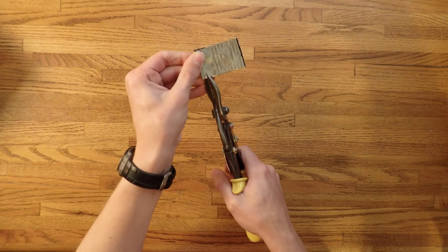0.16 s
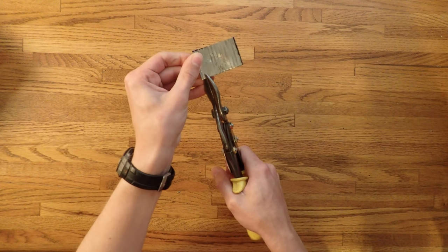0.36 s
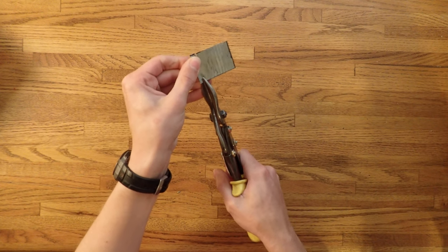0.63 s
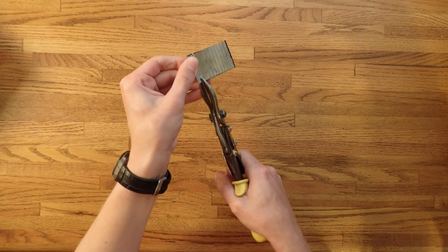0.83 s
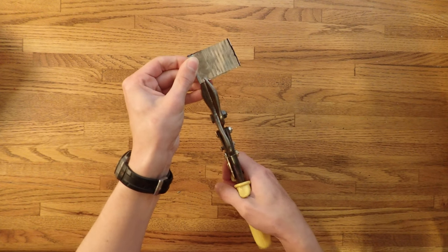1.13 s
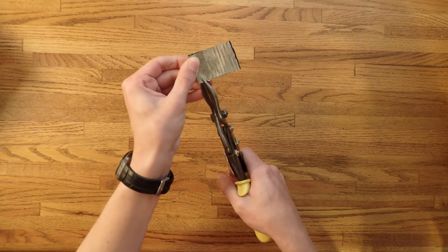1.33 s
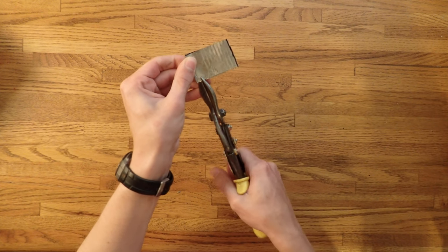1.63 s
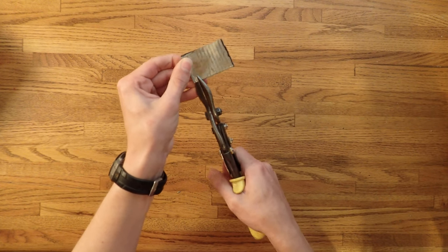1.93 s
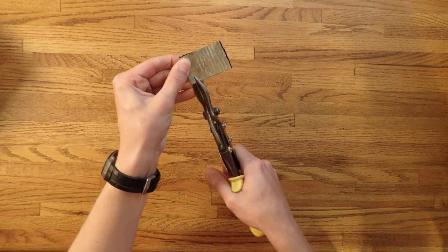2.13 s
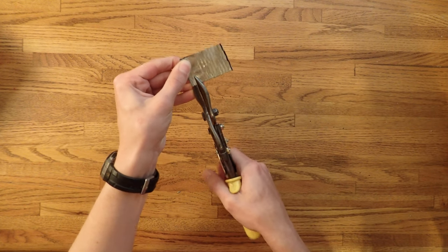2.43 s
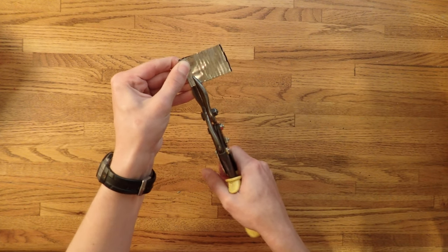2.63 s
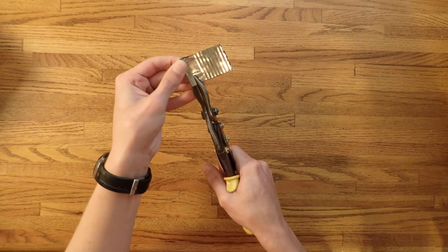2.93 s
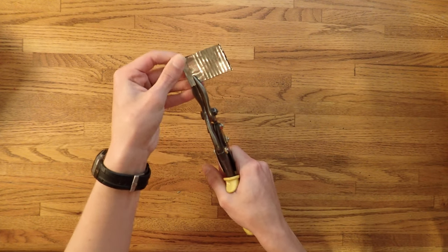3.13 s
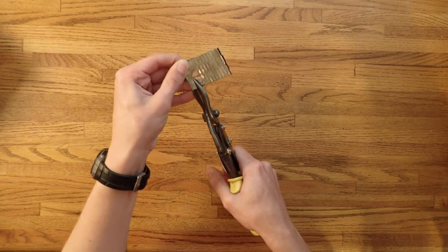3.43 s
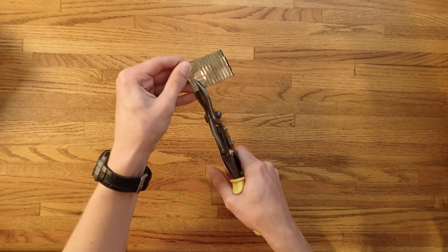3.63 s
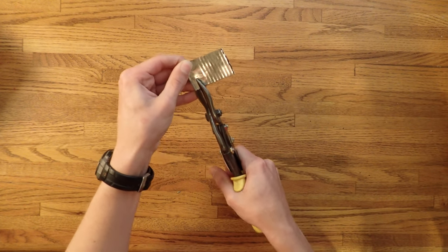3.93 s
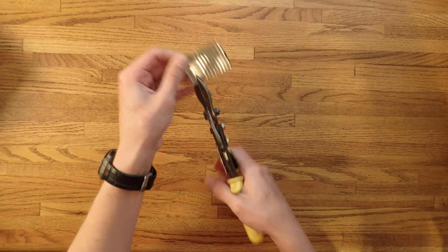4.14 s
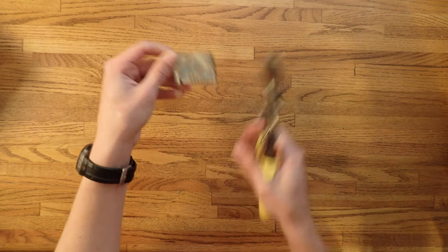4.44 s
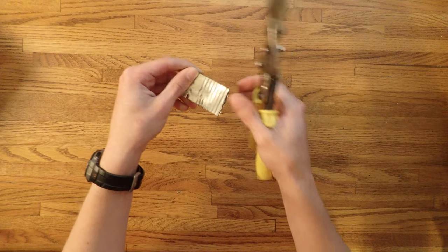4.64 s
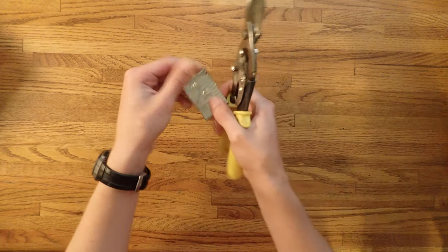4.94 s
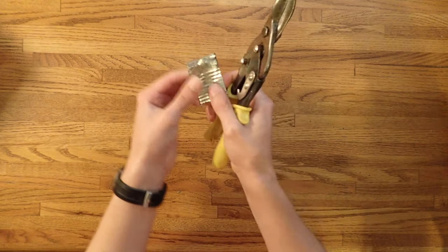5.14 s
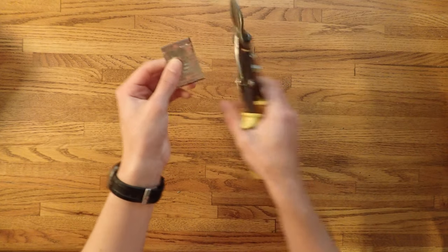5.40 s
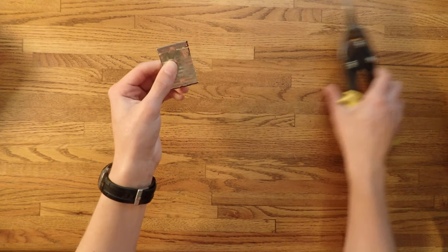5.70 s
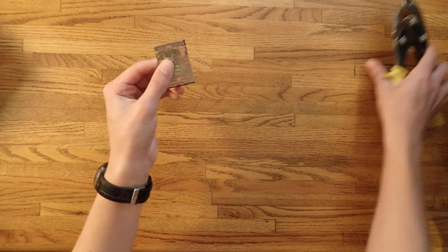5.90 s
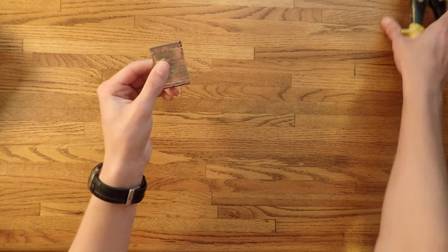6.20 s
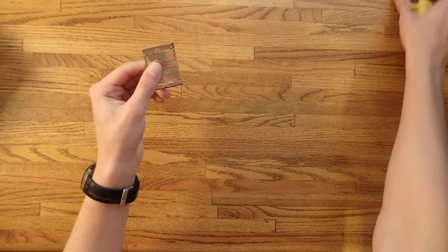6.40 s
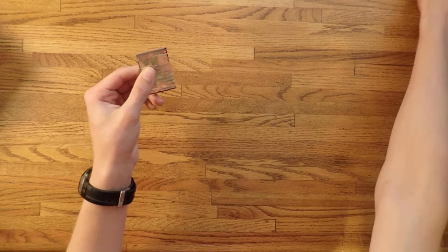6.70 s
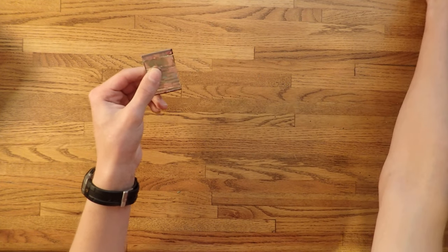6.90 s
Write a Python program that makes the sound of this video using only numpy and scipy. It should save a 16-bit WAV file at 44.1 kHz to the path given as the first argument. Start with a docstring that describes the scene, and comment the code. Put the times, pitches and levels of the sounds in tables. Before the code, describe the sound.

Hand snips work on a small piece of sheet steel, recorded near, with a short room reflection and faint hiss. Bright uneven ticks and stick-slip rasps lead to four hard metallic snaps over the first four seconds. Afterwards come lighter rattles of the loose jaws, a hard knock on wood, softer thuds and a brief judder with squeals.

```python
"""Tin snips on a metal sheet

Tin snips cut four short slits in a small metal sheet, indoors over a wooden table.
The blades rub in stick-slip strokes and ticks: shaped noise that rings the modes of the steel.
Each cut crunches in tiny fractures and ends in a sharp snap that sets the sheet shivering.
The snips are then set down with knocks, and scrape and squeak as they are pushed aside."""
import sys
import numpy as np
from scipy import signal
from scipy.fft import rfft, irfft, next_fast_len
from scipy.io import wavfile

SR = 44100
rng = np.random.default_rng(int(sys.argv[2]) if len(sys.argv) > 2 else 0)


def int16_out(signal):
    """Quantize to a 16-bit WAV file."""
    q = np.round(np.clip(np.atleast_2d(signal).T, -1, 1) * 32767)
    wavfile.write(sys.argv[1], SR, q.astype(np.int16))


N = 311331
TIME = np.arange(N) / SR
SIZE = next_fast_len(N + SR // 4, True)  # padded so that tails do not wrap around
FREQ = np.fft.rfftfreq(SIZE, 1 / SR)


def amp(db):
    """Amplitude factor of a level in dB."""
    return 10 ** (np.asarray(db) / 20)


def unit(x):
    """x scaled to rms 1."""
    return x / np.sqrt(np.mean(x ** 2) + 1e-20)


def along(points, hz=FREQ):
    """Curve through (frequency [Hz], value) points, straight on a log-frequency axis."""
    point_hz, values = np.transpose(points)
    return np.interp(np.log(hz + 1), np.log(point_hz + 1), values)


def filtered(x, response):
    """x through a frequency response."""
    return irfft(rfft(x, SIZE) * response, SIZE)[..., :N]


def causal(gain):
    """Minimum-phase response of unit power with the shape of the given gain."""
    cepstrum = irfft(np.log(np.maximum(gain, 1e-6)), SIZE)
    # folding the cepstrum forward in time makes the response start at once
    cepstrum[1:SIZE // 2] *= 2
    cepstrum[SIZE // 2 + 1:] = 0
    return np.exp(rfft(cepstrum)) / np.sqrt(np.mean(gain ** 2))


def ringing(modes):
    """Gain of a broad response with resonances standing on it."""
    response = 1
    for hz, width_hz, db in modes:
        damping = 1j * FREQ * width_hz
        response = response + amp(db) * damping / (hz * hz - FREQ ** 2 + damping)
    return np.abs(response)


def add(track, s, x):
    """Mix x into track at time s."""
    i = int(np.clip(round(s * SR), 0, N - 1))
    track[..., i:i + x.shape[-1]] += x[..., :N - i]


def grit(count):
    """White noise for one short contact."""
    return np.resize(rng.standard_normal(SR // 4), count)


def burst(length, fall_db):
    """A dying rattle of micro-contacts, rms about 1.7 (the square root of 3) over three times its length."""
    t = np.arange(int(3 * length * SR) + 2) / SR
    # past the nominal length the fall steepens
    shape = amp(-abs(fall_db) * t / length - 9.9 * np.maximum(t / length - 1, 0))
    return unit(grit(len(t)) * shape) * np.sqrt(3)


def tick(length, strike_share, rise_s):
    """A short rattle with one sharp strike as it builds up, rms about 1 over its length."""
    t = np.arange(int(3 * length * SR) + 2) / SR
    fall = amp(-8 * t / length - 11 * np.maximum(t / length - 1, 0))
    rattle = grit(len(t)) * fall * (1 - np.exp(-t / rise_s))
    share = np.clip(strike_share, 0, 1)  # of the energy
    force = np.sqrt(1 - share) * rattle / np.linalg.norm(rattle)
    force[min(int(rise_s * SR), len(t) - 1)] += np.sqrt(share)
    return force * np.sqrt(length * SR)


def stick_slip(length, rate, swell_db, jitter, slip_s, grit_db, rise_s):
    """Uneven slips that catch and let go over a thin, steady grit, rms 1."""
    t = np.arange(int(max(length, .002) * SR)) / SR
    gaps = np.exp(jitter * rng.standard_normal(256)) / rate
    starts = np.cumsum(gaps) - gaps[0]
    last = np.searchsorted(starts, t, "right") - 1
    sizes = amp(rng.normal(0, 0.95, len(starts)))
    shape = sizes[last] * np.exp(-(t - starts[last]) / slip_s) + amp(grit_db)
    pressure = amp(swell_db * t / length) * (1 - np.exp(-t / rise_s))
    return unit(grit(len(t)) * shape * pressure)


# tone of the quiet background: (frequency [Hz], relative level [dB])
HUSH_TONE = [(15, -41), (25, -11.5), (130, -3.5), (161, -5.5), (236, -7), (439, -10), (476, -11),
             (641, -14), (695, -14), (1740, -22), (2220, -27), (3080, -27.5), (4870, -28.5), (7710, -24.5),
             (16000, -28.5)]
# how alike the background is left and right: (frequency [Hz], correlation [-1 to 1])
HUSH_LIKENESS = [(60, 0.29), (180, 0.11), (550, 0.038), (1650, 0.12), (4970, 0.067), (15000, -0.2)]
HUSH_DB = -51.5  # rms of its mid signal


def hush():
    """Quiet room rumble and microphone hiss: coloured noise with a hiss peak near 8 kHz."""
    turn = np.arccos(np.clip(along(HUSH_LIKENESS), -1, 1)) / 2
    low_cut = 1 / np.sqrt(1 + (38 / (FREQ + 1)) ** 8)
    colour = amp(along(HUSH_TONE)) * ringing([(7630, 1200, 4.2)]) * low_cut
    balance = np.array([np.cos(turn), np.sin(turn)])
    mid, side = filtered(rng.standard_normal((2, N)), colour * balance)
    return amp(HUSH_DB) * np.array([mid + side, mid - side]) / np.std(mid)


# decay of the room: (frequency [Hz], t60 [s])
ROOM_DECAY = [(150, 0.42), (600, 0.3), (2000, 0.27), (5000, 0.29), (8000, 0.24), (15000, 0.19)]
# stereo width of the room's answer: (frequency [Hz], side against mid [dB])
ROOM_WIDTH = [(300, -25), (1500, -22), (4000, -7), (8000, -2.5), (14000, 3.5)]


def room(x, wet_db):
    """Near walls answer with a short, dying noise tail, drawn anew each quarter second."""
    out, step = np.zeros((2, N)), SR // 4
    for i in range(0, N, step):
        hz, t, spectrum = signal.stft(rng.standard_normal((2, SR // 3)), SR, nperseg=256)
        build = 1 - np.exp(-t / 0.0005)
        decay = amp(-60 * t / along(ROOM_DECAY, hz)[:, None])
        tail = signal.istft(spectrum * build * decay, SR, nperseg=256)[1]
        tail = tail / np.linalg.norm(tail[0])
        add(out, i / SR, signal.fftconvolve(x[None, i:i + step], tail, axes=1))
    mid, side = out[0], filtered(out[1], amp(along(ROOM_WIDTH)))
    return amp(wet_db) * np.array([mid + side, mid - side])


# stereo width of the direct sound: (frequency [Hz], side against mid [dB])
PORT_WIDTH = [(300, -23), (1500, -19), (4000, -12), (8000, -10.5), (14000, -4)]
PORT_RIPPLE_HZ = 4100  # the lead passes from port to port and back over this span of pitch


def ports(x):
    """Two close microphone ports hear the treble with different phase."""
    ripple = np.sqrt(2) * np.cos(2 * np.pi * FREQ / PORT_RIPPLE_HZ)
    side = filtered(x, 1j * amp(along(PORT_WIDTH)) * ripple)
    return np.array([x + side, x - side])


# tone of the faint touches: (frequency [Hz], relative level [dB])
TAP_TONE = [(300, -1), (1200, -14), (3300, 3), (4500, -3.5), (8000, -9), (16000, -32)]
TAPS_PER_S, TAP_DB, TAP_SPREAD_DB = 5, -63, 3  # mean rate, typical level and its random spread


def taps():
    """Fingers shift the sheet, which touches the blade faintly at random."""
    force = np.zeros(N)
    times = np.cumsum(rng.exponential(size=128)) / TAPS_PER_S
    for s, spread in zip(times, rng.standard_normal(size=128)):
        touch = amp(TAP_DB + TAP_SPREAD_DB * spread) * burst(0.005, fall_db=4)
        if s < TIME[-1]:
            add(force, s, touch)
    return filtered(force, causal(amp(along(TAP_TONE))))


# the sheet is flicked or springs back, and at 4.17 s the snips clack open: (time [s], level [dB], pitch [Hz],
# t60 [s])
PING_CUES = [(0.83, -41.5, 3520, 0.036), (0.855, -44, 3570, 0.03), (0.872, -46, 3530, 0.027),
             (1.699, -32.5, 364, 0.054), (4.17, -27, 1070, 0.037), (4.1697, -21.5, 2830, 0.042),
             (5.008, -28.5, 3045, 0.048)]


def pings():
    """One mode rings as a dying sine after a soft flick: of the sheet, or of the snips as they clack open at
    4.17 s."""
    t, out = np.arange(SR // 4) / SR, np.zeros(N)
    for s, db, hz, t60 in PING_CUES:
        ring = np.sin(2 * np.pi * hz * t) * (1 - np.exp(-t / 0.0002))
        add(out, s, amp(db - 60 * t / t60) * ring)
        around_pitch = signal.butter(1, [0.5 * hz, 1.8 * hz], "band", fs=SR)
        click = tick(0.0067, strike_share=0.29, rise_s=0.0004)
        add(out, s, amp(db) * signal.lfilter(*around_pitch, click))
    return out


# scrape of the snips on the wood, before judder: (time [s], level [dB])
SCRAPE_LEVEL = [(6.822, -57), (6.833, -29), (6.855, -44), (6.873, -32.5), (6.893, -44), (6.918, -40),
                (6.955, -45.5), (6.98, -55)]
# tone of the scrape: (frequency [Hz], relative level [dB])
SCRAPE_TONE = [(30, -30), (60, -13), (190, 0), (450, -1), (750, -0.5), (1100, -10), (1500, 2), (1950, -3.5),
               (2400, -10), (2800, 1.5), (3650, 0), (4500, -10), (6000, -4.5), (9000, -23), (14000, -37)]
# squeals of the dragged steel: (start [s], end [s], peak level [dB], tilt [dB per octave])
SQUEAL_CUES = [(6.827, 6.873, -34, 8), (6.866, 6.913, -29, -3)]
# tones of each squeal: (pitch [Hz], relative level [dB], glide [share of the pitch])
SQUEAL_PARTS = [(1493, -2.5, 0.075), (2330, -1.5, -0.02), (3750, -7, -0.052)]


def slide(waver_hz, judder_db):
    """Dragging scrapes the wood in judders and sets off short gliding squeals."""
    s, scrape_db = np.transpose(SCRAPE_LEVEL)
    wobble = unit(filtered(rng.standard_normal(N), FREQ < 130))
    scrape = unit(filtered(rng.standard_normal(N), amp(along(SCRAPE_TONE))))
    level = amp(np.interp(TIME, s, scrape_db) + judder_db * wobble)
    out = level * scrape * (TIME > s[0]) * (TIME < s[-1])
    for start, end, db, tilt_db in SQUEAL_CUES:
        u = np.linspace(0, 1, int(max(end - start, .005) * SR))
        local_wobble = wobble[int(start * SR):][:len(u)]
        for centre_hz, tone_db, glide in SQUEAL_PARTS:
            ratio = centre_hz / SQUEAL_PARTS[0][0]
            hz = centre_hz * (1 + glide * (u - .5)) + waver_hz * ratio * local_wobble
            swell = amp(db + tone_db + tilt_db * np.log2(ratio)) * np.sin(np.pi * u)
            add(out, start, swell * np.sin(2 * np.pi * np.cumsum(hz) / SR))
    return out


# the snips meet the table: (time [s], relative level [dB], softness corner [Hz])
KNOCK_CUES = [(6.076, -16.5, 7200), (6.154, -29.5, 2500), (6.185, -24, 1010), (6.38, -38, 2000),
              (6.397, -34, 1800), (6.7638, -21.5, 850), (6.868, -28, 3000), (6.887, -28.5, 600)]
ROCK_S, ROCK_DB, ROCK_SOFTER = 0.02, -10, 0.75  # one rock after a knock: delay, level, corner ratio


def landings():
    """Every knock and the softer rock of the tool that follows it."""
    rocks = [(s + ROCK_S, db + ROCK_DB, hz * ROCK_SOFTER) for s, db, hz in KNOCK_CUES]
    return list(KNOCK_CUES) + rocks


# tone of steel on wood: (frequency [Hz], relative level [dB])
WOOD_TONE = [(40, -27), (120, 5), (250, -8), (390, 2.5), (600, 2), (800, 1), (1000, 3), (1320, 0),
             (1800, -0.5), (3000, 1.5), (5000, -11), (9000, -19.5), (16000, -5.5)]
# modes of the table's boards: (frequency [Hz], width [Hz], level over the broad response [dB])
BOARD_MODES = [(386, 30, 6), (513, 30, 2), (1236, 30, 2), (1329, 40, 10), (3080, 60, 1)]
# tone of the rubber grips' thud: (frequency [Hz], relative level [dB])
GRIP_TONE = [(30, -30), (60, -2), (150, -4.5), (380, 0), (520, 4), (720, 3.5), (1050, 0), (1400, 3.5),
             (2200, -1), (4000, -14), (9000, -9.5), (16000, -29)]
HARD_HZ = 7600  # a blow with this corner puts all of its force into the boards' ring


def knocks(level_db):
    """Steel rings the table's boards; the rubber grips land with a dull thud."""
    hard, dull = np.zeros((2, N))
    for s, db, corner_hz in landings():
        soft = signal.butter(2, min(corner_hz, SR / 3), fs=SR)
        contact = tick(0.009, strike_share=0.35, rise_s=0.00093)
        blow = amp(db + level_db) * signal.lfilter(*soft, contact)
        share = np.clip(corner_hz / HARD_HZ, 0, 1)
        add(hard, s, share * blow)
        add(dull, s, (1 - share) * blow)
    boards = filtered(hard, causal(amp(along(WOOD_TONE)) * ringing(BOARD_MODES)))
    return boards + filtered(dull, causal(amp(along(GRIP_TONE))))


# tone of the jolted jaws: (frequency [Hz], relative level [dB])
CLINK_TONE = [(500, -34), (3000, -1), (4200, 0), (8000, 4), (10000, -6), (16000, -7)]
# modes of the snips clear of the sheet, for clinks and late rubbing:
# (frequency [Hz], width [Hz], level over the broad response [dB])
FREE_MODES = [(1480, 55, 8), (3030, 57, 8.5), (3940, 80, 15.5), (4230, 92, 18.5), (6200, 66, -30),
              (7260, 180, -1), (7500, 450, -6), (8130, 510, 4)]


def clinks(level_db):
    """Each knock and rock also jolts the loose jaws, a short rattle that rings the free steel."""
    force = np.zeros(N)
    for s, db, _ in landings():
        add(force, s, amp(db + level_db) * burst(0.0084, fall_db=23))
    return filtered(force, causal(amp(along(CLINK_TONE)) * ringing(FREE_MODES)))


# the jaws break through or spring free:
# (time [s], relative level of the push [dB], relative level of the sheet's shiver [dB])
SNAP_CUES = [(1.7187, -7, -31), (2.288, -5, -27), (2.795, -10.5, -25.5), (3.8436, -6, -22.5),
             (4.1691, -17, -29)]
# tone of the shivering thin sheet: (frequency [Hz], relative level [dB])
SHIVER_TONE = [(300, -37), (420, -17), (800, -34), (1300, -21), (1650, 3), (2050, 0), (2550, -4), (3050, 1),
               (3700, -13), (4400, -1), (8000, -19), (16000, -37)]
SHIVER_T60_S = 0.085


def shiver():
    """The sheet's many close modes flutter briefly after each snap, as dying noise."""
    t, force = np.arange(SR // 4) / SR, np.zeros(N)
    for s, _, db in SNAP_CUES:
        add(force, s, amp(db - 60 * t / SHIVER_T60_S) * grit(len(t)))
    return filtered(force, causal(amp(along(SHIVER_TONE))))


# tone of a snap: (frequency [Hz], relative level [dB])
SNAP_TONE = [(100, -37), (350, -15), (750, -24), (1200, -13), (1700, 3), (2200, 5), (2700, -1.5),
             (3200, -12), (5000, -6.5), (8000, -13.5), (11000, -20), (16000, -23)]
# modes of the steel jaws and sheet, for snaps, cuts and rubbing:
# (frequency [Hz], width [Hz], level over the broad response [dB])
STEEL_MODES = [(1130, 60, -6), (2010, 30, 4), (2304, 45, 2), (2790, 38, 0), (3076, 55, 4), (3205, 43, 4),
               (3406, 43, 0), (4197, 38, 6), (4295, 35, 3), (4555, 150, 0), (4805, 45, 5), (5250, 32, 6),
               (7440, 150, -1), (7950, 200, -1), (8390, 120, 0), (14800, 1500, 2)]


def snaps(chatter_db, ring_db):
    """The load lets go at once: one sharp push, then a brief chatter of the steel."""
    push, chatter = np.zeros(N), np.zeros(N)
    for s, db, _ in SNAP_CUES:
        add(push, s, amp([db]))
        add(chatter, s, amp(db + chatter_db) * burst(0.0019, fall_db=-3))
    colour = amp(along(SNAP_TONE))
    crack = causal(colour)
    crack /= np.abs(irfft(crack, SIZE)).max()  # peak 1
    damped = causal(colour * np.sqrt(ringing(STEEL_MODES)))  # the closed jaws damp the modes
    return amp(2.5) * filtered(push, crack) + filtered(chatter + amp(ring_db) * push, damped)


# the sheet shears: (start [s], end [s], relative level [dB])
CUT_CUES = [(1.695, 1.715, -18), (2.266, 2.288, -19), (2.776, 2.798, -20.5), (3.836, 3.847, -24.5)]
# tone of the tearing sheet: (frequency [Hz], relative level [dB])
SHEAR_TONE = [(100, -29), (350, -20), (800, -26), (1200, -10), (1650, -18), (2100, 2), (2600, -11),
              (3200, 3.5), (3800, -4.5), (4500, 3), (6500, -4), (7900, 4.5), (10000, -16.5), (16000, -18.5)]


def cuts(level_db):
    """The sheet tears in a dense crunch of tiny fractures, about 1000 a second."""
    force = np.zeros(N)
    for s, end, db in CUT_CUES:
        crunch = stick_slip(end - s, 1000, swell_db=1.0, jitter=0.32, slip_s=0.0013,
                            grit_db=-10, rise_s=0.0017)
        add(force, s, amp(db + level_db) * crunch)
    return filtered(force, causal(amp(along(SHEAR_TONE)) * np.sqrt(ringing(STEEL_MODES))))


# level of the steel's lower modes against its high ones, for a contact of usual level:
# (time [s], middle modes [dB], low modes [dB])
MODE_BALANCE = [(0.1, -6, -8.5), (0.5, -9, -7.5), (0.7, -10.5, -7.5), (1.45, -4, -7), (2.3, -4, -11),
                (3.6, -0.5, -11.5), (4.3, -4, -10.5), (4.9, -10.5, -12), (5.5, -6.5, -17), (6.0, -7, -9.5),
                (7.0, -6, -10)]
USUAL_DB = -30
# harder contacts ring brighter: dB these modes fall behind per dB over the usual level
MIDDLE_LAG, LOW_LAG = 0.38, 0.21


def weights(s, db):
    """How strongly a contact drives the high, middle and low modes."""
    times, middle_db, low_db = np.transpose(MODE_BALANCE)
    harder = db - USUAL_DB
    middle = db + np.interp(s, times, middle_db) - MIDDLE_LAG * harder
    low = db + np.interp(s, times, low_db) - LOW_LAG * harder
    return amp([[db], [middle], [low]])


# ranges of the high, middle and low modes: (lower edge [Hz], upper edge [Hz])
MODE_BANDS = [(6300, 20000), (3600, 6300), (900, 3600)]


def steel(force, colour, modes):
    """The high, middle and low drives ring their parts of the steel."""
    body = amp(along(colour)) * ringing(modes)
    out = 0
    for drive, (low_hz, high_hz) in zip(force, MODE_BANDS):
        band = 1 / np.sqrt((1 + (low_hz / (FREQ + 1)) ** 10) * (1 + (FREQ / high_hz) ** 20))
        out = out + filtered(drive, causal(body * band))
    return out


# single slips of blades and pivot: (time [s], length [s], relative level [dB])
TICK_CUES = [(0.092, 0.0095, -30), (0.114, 0.0044, -24), (0.125, 0.023, -28), (0.162, 0.014, -23.5),
             (0.225, 0.0025, -28), (0.263, 0.0035, -30), (0.283, 0.0065, -29), (0.314, 0.0044, -30),
             (0.3253, 0.0085, -18.5), (0.3485, 0.01, -21), (0.567, 0.015, -26), (0.597, 0.0064, -21.5),
             (0.6076, 0.0045, -21), (0.6973, 0.016, -27), (1.0947, .005, -44), (1.1722, 0.013, -27.5),
             (1.382, 0.012, -36), (1.415, .0055, -28), (1.4386, 0.011, -25.5), (1.455, 0.0033, -29),
             (1.469, 0.0046, -23.5), (1.492, 0.01, -21), (1.515, 0.0077, -17.5), (1.5316, 0.0031, -18.5),
             (1.666, 0.013, -20), (2.074, 0.0046, -22), (2.1084, 0.0018, -20), (2.541, 0.0057, -21),
             (2.614, 0.0036, -34), (3.471, 0.0038, -23), (3.5573, 0.0045, -26.5), (3.7874, 0.005, -38),
             (4.0486, 0.0047, -44), (4.088, 0.0074, -31.5), (4.238, 0.0056, -28), (4.4107, 0.0034, -30.5),
             (4.7455, 0.0015, -27.5), (4.805, 0.0058, -31), (4.852, 0.0061, -24), (4.882, 0.0051, -24),
             (4.907, .008, -18.5), (4.938, .01, -20), (4.968, 0.0081, -22), (5.383, 0.0029, -24.5),
             (5.42, 0.013, -27), (5.443, 0.0029, -22.5), (5.543, .003, -45), (5.5587, 0.0051, -22.5),
             (5.592, 0.0038, -21), (5.818, 0.0084, -26.5), (5.925, 0.012, -30), (5.956, 0.014, -30),
             (5.977, 0.0054, -32.5), (6.0205, 0.0071, -32), (6.057, 0.026, -35), (6.165, 0.0077, -33),
             (6.216, 0.0053, -32), (6.376, 0.0066, -31.5), (6.5528, 0.0057, -28.5), (6.581, 0.0039, -34),
             (6.7076, .0057, -29.5), (6.911, 0.04, -37.5)]
# rubbing strokes: (start [s], end [s], slip rate [per s], swell [dB], relative level [dB])
STROKE_CUES = [(0.356, 0.47, 103, 2.5, -25.5), (0.458, 0.539, 142, -2, -21.5), (1.137, 1.164, 540, 2, -24),
               (1.302, 1.406, 100, 8, -41.5), (1.67, 1.695, 190, 14, -26), (1.917, 2.003, 141, -1.5, -26),
               (2.009, 2.112, 88, 0, -39.5), (2.207, 2.26, 210, -1, -44.5), (2.466, 2.503, 460, 12, -32),
               (2.489, 2.532, 142, -2, -25), (2.574, 2.604, 73, 2, -40), (2.746, 2.795, 520, 14, -31.5),
               (3.382, 3.406, 380, 10, -37), (3.406, 3.458, 360, 0, -31.5), (3.814, 3.854, 600, 15, -32.5),
               (4.079, 4.108, 340, 12, -30.5), (4.108, 4.22, 270, -2, -23.5), (4.429, 4.516, 186, -10, -44),
               (4.758, 4.883, 94, 16.5, -34), (5.335, 5.379, 233, 17, -28), (5.825, 5.862, 380, -1, -29),
               (6.392, 6.437, 69, -6, -35), (6.557, 6.592, 250, 4, -38.5), (7.005, 7.059, 120, -11, -39)]
# tones of the rubbing against the sheet, in the air and lying flat:
# (frequency [Hz], relative level [dB])
SHEET_RUB_TONE = [(410, -51.5), (700, -43), (1060, -14), (1350, -20), (2080, -6.5), (2490, -15),
                  (3990, -3.5), (4380, -0.5), (6570, -6.5), (7690, 1.5), (8530, -0.5), (9480, -16),
                  (11200, -19), (14400, -13.5), (16000, -35)]
AIR_RUB_TONE = [(400, -70), (800, -15), (1450, -21), (2400, -19), (2900, -16.5), (4100, -15.5), (4700, -9),
                (6500, -8.5), (7700, 0), (9300, -18), (12000, -21), (14800, -12), (16000, -37)]
FLAT_RUB_TONE = [(400, -49), (900, -5), (1500, -10.5), (3200, -8), (4200, -2.5), (5500, -2), (7800, -3.5),
                 (9500, -14), (12000, -13), (15000, -12), (16000, -21)]
FREE_S, FLAT_S = 4.3, 5.9  # the snips leave the sheet, then turn flat towards the table
LOADED_RISE_S, LOOSE_RISE_S = 0.0003, 0.001587  # ticks build fast while the blades bite, slower loose
REBOUND_S, REBOUND_DB = 0.015, -22  # the loose joint falls back: typical delay, level against the slip


def blades(tick_db, stroke_db):
    """Ticks and rubbing shake the steel: against the sheet, in the air, then near the table."""
    force = np.zeros((3, N))  # drives of the high, middle and low modes
    for s, length, db in TICK_CUES:
        rise_s = LOADED_RISE_S if s < FREE_S else LOOSE_RISE_S
        rebound_at = s + REBOUND_S * np.exp(0.3 * rng.standard_normal())
        slip = tick(length, strike_share=0.087, rise_s=rise_s)
        add(force, s, amp(tick_db) * weights(s, db) * slip)
        rebound = tick(0.0018, strike_share=0.11, rise_s=rise_s)
        add(force, rebound_at, amp(tick_db) * weights(s, db + REBOUND_DB) * rebound)
    for s, end, rate, swell_db, db in STROKE_CUES:
        rub = stick_slip(end - s, rate, swell_db, jitter=0.12, slip_s=0.0019,
                         grit_db=-18, rise_s=0.0023)
        add(force, s, amp(stroke_db) * weights(s, db) * rub)
    free, flat = TIME > FREE_S, TIME > FLAT_S
    cutting = steel(force * ~free, SHEET_RUB_TONE, STEEL_MODES)
    in_air = steel(force * (free & ~flat), AIR_RUB_TONE, FREE_MODES)
    lying_flat = steel(force * flat, FLAT_RUB_TONE, FREE_MODES)
    return cutting + in_air + lying_flat


# stereo balance of everything but the hush: (frequency [Hz], left against right [dB])
STEREO_LEAN = [(60, 0), (110, -3), (200, 1.5), (380, -0.5), (700, -1.5), (1290, -0.5), (2380, -3),
               (4400, 0), (8120, -0.5), (15000, 1)]


def scene():
    """The tool, the table and the room that answers both, over the hush."""
    rubbing = blades(tick_db=-3.0, stroke_db=-4.5) + pings() + taps()
    shearing = cuts(level_db=0.5)
    snapping = snaps(chatter_db=-21.5, ring_db=-1) + shiver()
    table = knocks(level_db=-3) + slide(waver_hz=34.3, judder_db=1.0) + clinks(level_db=-22.5)
    # the room answers the table most strongly and the snaps least
    to_room = rubbing + amp(-0.5) * shearing + amp(-1.5) * snapping + amp(4.5) * table
    echoes = room(to_room, wet_db=-7)
    near = ports(rubbing + shearing + snapping + table) + echoes
    lean_db = along(STEREO_LEAN)
    return filtered(near, amp(np.array([lean_db, -lean_db]) / 2)) + hush()


TOP_HZ = 16200


def record(dry):
    """A very steep low-pass removes the treble above the band limit."""
    return filtered(dry, 1 / np.sqrt(1 + (FREQ / TOP_HZ) ** 200))


dry = scene()
out = record(dry)
int16_out(out)
```